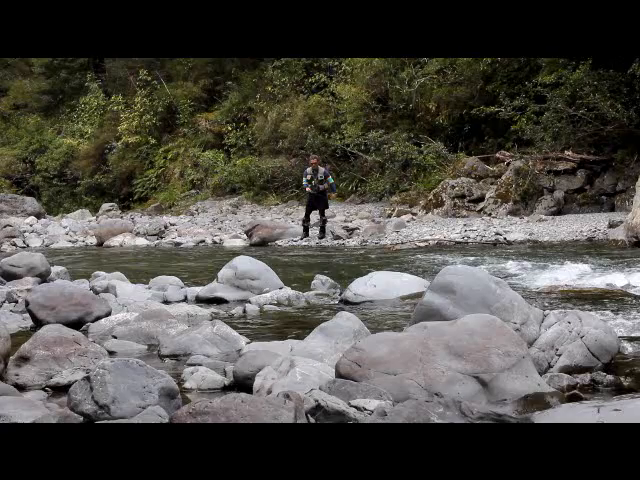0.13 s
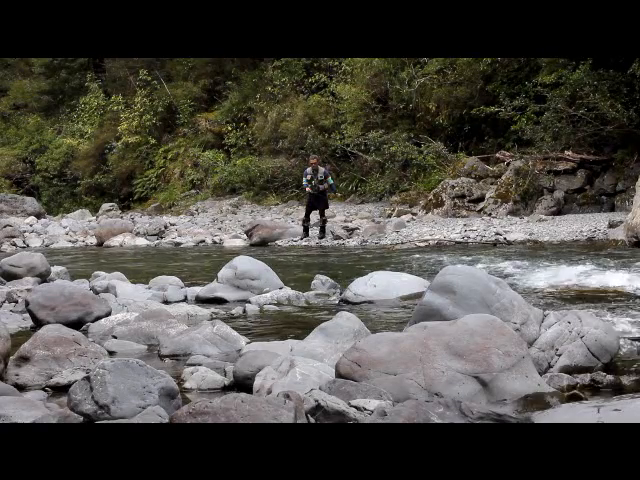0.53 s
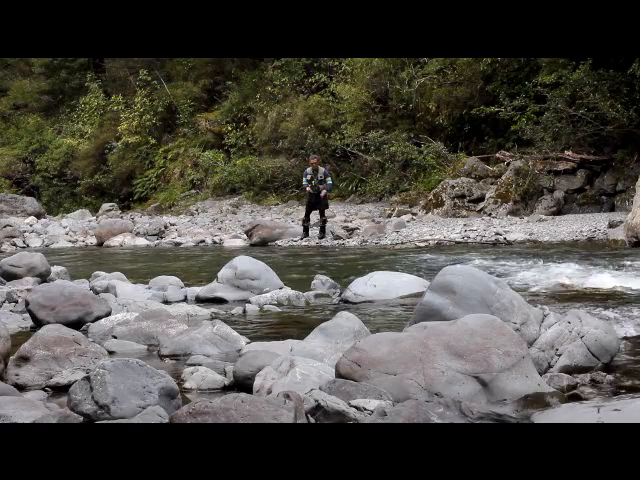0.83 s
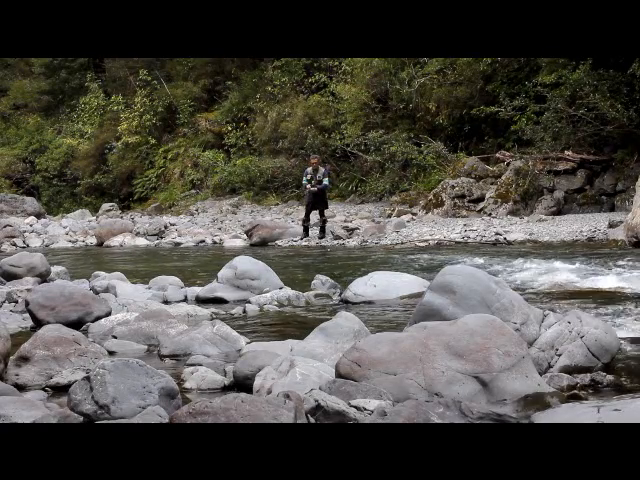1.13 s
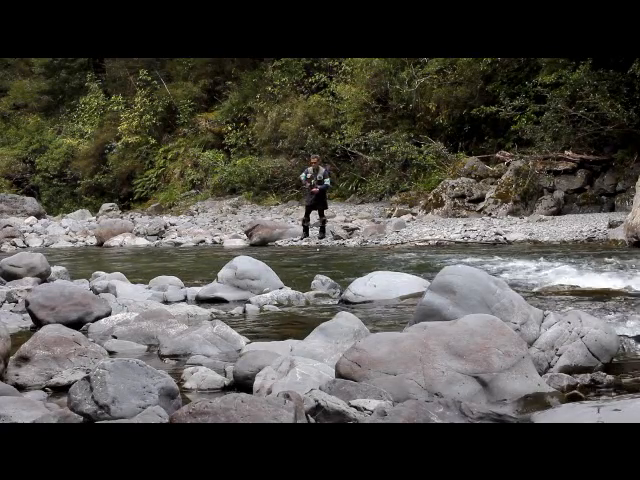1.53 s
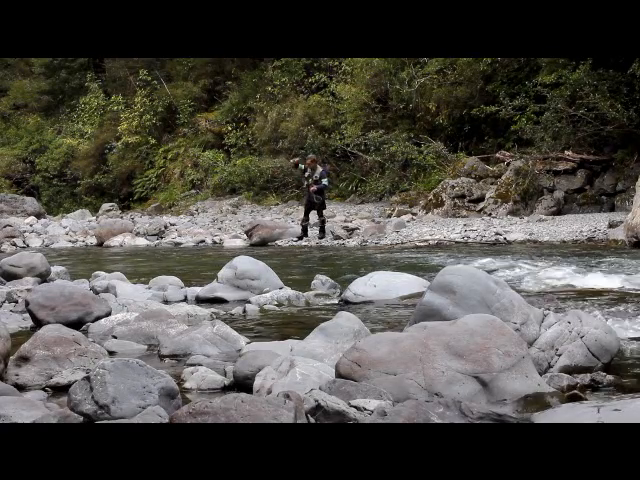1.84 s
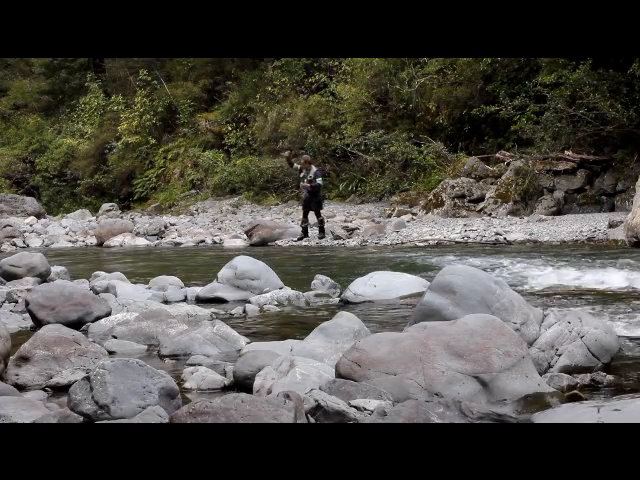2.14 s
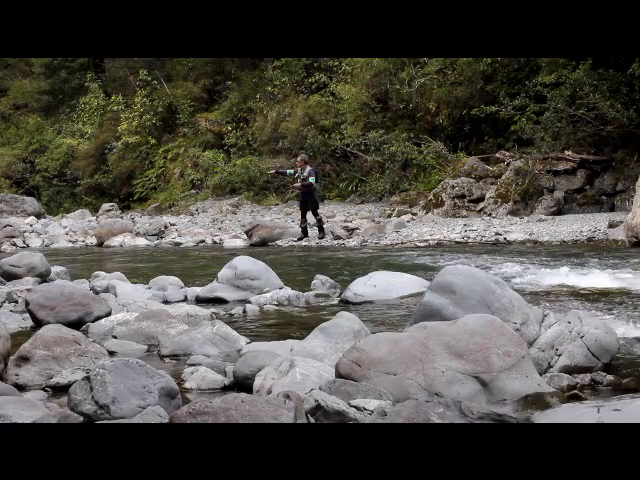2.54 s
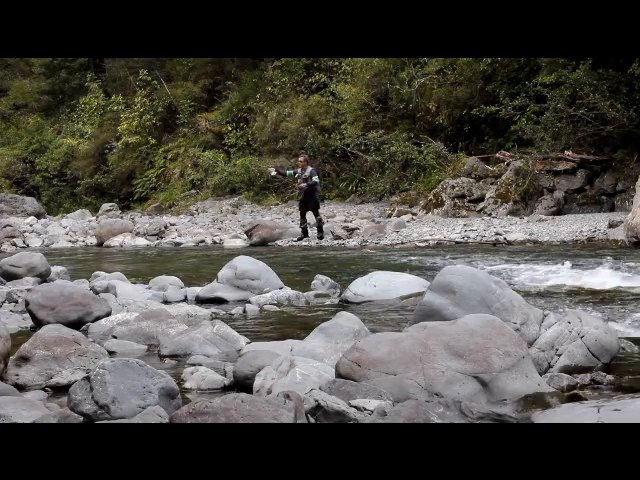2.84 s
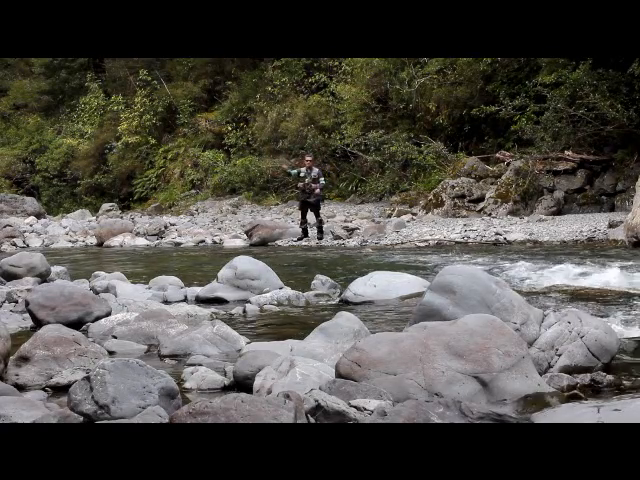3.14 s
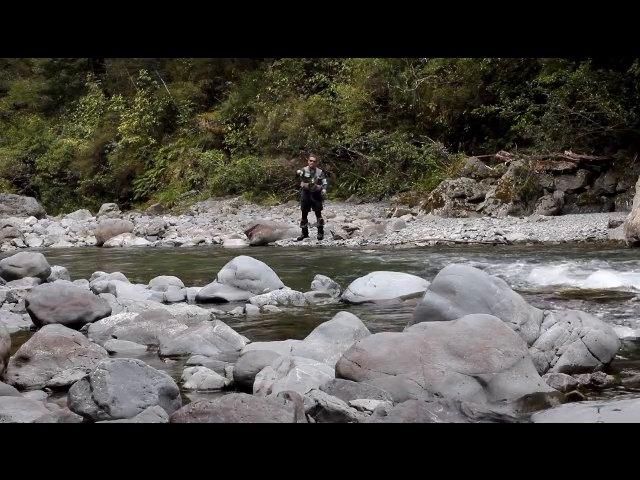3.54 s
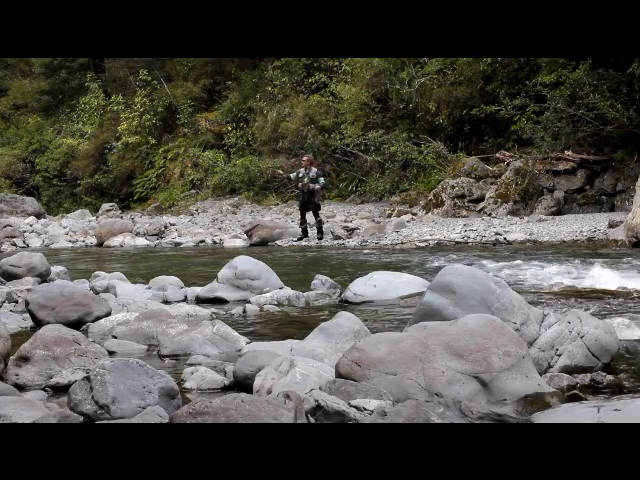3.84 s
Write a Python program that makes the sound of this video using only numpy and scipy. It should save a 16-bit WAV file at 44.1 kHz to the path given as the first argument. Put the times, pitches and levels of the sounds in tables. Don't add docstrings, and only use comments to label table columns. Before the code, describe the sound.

A shallow river tumbles over boulders, a dense mid-low rush with softer airy spray, fading up evenly from silence to its loudest at 4 s. Countless bubbles gurgle throughout. A low gulp comes at 0.75 s, a cluster of gulps and a plop at 1.7-2.1 s, a tiny tick at 2.6 s, and high plops at 3.4 and 3.9 s. A far bird whistles very faintly around 1.1 s and from 2.4 s onward.

```python
import sys
import numpy as np
from scipy import signal
from scipy.fft import rfft, irfft
from scipy.io import wavfile
from scipy.ndimage import uniform_filter1d

SR = 44100
rng = np.random.default_rng(int(sys.argv[2]) if len(sys.argv) > 2 else 0)


def file_out(sig):
    cols = np.atleast_2d(sig).T
    lim = np.clip(cols, -1, 1)
    pcm = np.round(lim * 32767).astype(np.int16)
    wavfile.write(sys.argv[1], SR, pcm)


def linear_from_db(decibels):
    return 10 ** (np.asarray(decibels, float) / 20)


N = 176400

# f/Hz, spectral level/dB
WATER_SPECTRUM = [(20, -43), (58, -36), (100, -16), (240, -6), (414, -2.5), (660, -4), (720, -9),
                  (1700, -10.5),
                  (2200, -14.5), (2800, -17), (3500, -20.5), (4200, -21), (5200, -24.5), (7000, -28),
                  (11000, -30.5), (14900, -34)]
# f/Hz, bandwidth/Hz, amplitude lift/1
HOLLOWS = [(275, 23, 0.25), (412, 48, 0.58), (630, 30, 0.51), (827, 62, 0.69), (1060, 210, 0.32)]
# t/s, level/dB
FLOW_SURGES = [(0, 1), (.3, -0.5), (.55, -1.5), (.75, -0.5), (1, 0), (1.25, -0.5), (1.48, -0.5),
               (1.68, -0.5), (1.9, -0.5), (2.15, -0.5), (2.4, -0.5), (2.65, -1), (2.9, -1), (3.15, -.5),
               (3.4, -0.5), (3.6, 0), (3.8, -0.5), (4, -0.5)]
# f/Hz, share/1
SURGE_SHARE = [(100, 0.46), (400, 3.3), (2000, 0.2), (10000, 0.22)]
# rate/(1/s), lowest f/Hz, highest f/Hz, decay/cycles, level/dB
SWARMS = [
    (34.05, 270, 470, 26.2, -38),
    (120, 4070, 13200, 9.0, -54),
]
# t/s, f/Hz, level/dB, decay/cycles
GULPS = [
    (.128, 50, -23, 1.1),
    (.67, 292, -28, 4.8),
    (.75, 300, -15, 7.5),
    (1.68, 330, -16, 8.4),
    (1.733, 830, -15, 9.0),
    (1.816, 300, -13, 7),
    (2.112, 270, -13.5, 7.9),
    (3.388, 950, -11.5, 4.8),
    (3.907, 800, -13.5, 8.6),
]
# t/s, lowest f/Hz, highest f/Hz, level/dB
SPLASHES = [(.49, 706, 1400, -29), (.66, 250, 516, -27), (.70, 248, 520, -22), (.975, 603, 1500, -27),
            (1.31, 1600, 2180, -26), (1.58, 300, 570, -24.5), (1.66, 302, 610, -23.5),
            (2.18, 450, 750, -22), (3.378, 650, 2180, -24)]
# t/s, f/Hz, level/dB, decay/cycles
DROPLETS = [
    (.721, 5300, -33, 45),
    (2.571, 4900, -29, 45),
    (3.409, 5000, -32, 45),
]
# t/s, duration/s, f/Hz, level/dB
BIRD_NOTES = [(1.02, .04, 4330, -47), (1.08, .035, 4330, -45), (1.15, .035, 4340, -46),
              (1.21, .04, 4330, -47), (2.365, .06, 4100, -46), (2.485, .105, 4080, -43),
              (2.64, .04, 4130, -46), (2.74, .03, 4100, -45), (2.94, .035, 3680, -45),
              (3.035, .045, 3850, -43), (3.15, .065, 3810, -43), (3.325, .045, 3810, -42),
              (3.46, .05, 3810, -43), (3.63, .03, 3840, -46), (3.685, .04, 3850, -43),
              (3.89, .04, 3810, -44)]
# t/s, lowest f/Hz, highest f/Hz
DIFFUSE_BANDS = [(.325, 4650, 6950), (.325, 8900, 10400), (.742, 7600, 9700), (.742, 13700, 15100),
                 (.998, 11800, 13200), (1.115, 12300, 13900), (1.162, 13700, 15100), (1.301, 14400, 15100),
                 (1.393, 10300, 12400), (1.789, 5100, 7650), (1.789, 8900, 10450), (2.298, 8300, 9800),
                 (2.509, 6850, 9700), (2.509, 11700, 13150), (3.019, 7500, 11050), (3.252, 9600, 13100),
                 (3.623, 7500, 9700)]
# t/s from which it holds, highest f/Hz
TOP_STEPS = [(0, 13200), (.21, 14700), (.28, 15100), (3.67, 14300), (3.79, 14800), (3.84, 14300),
             (3.9, 14800), (3.96, 14300)]

BUBBLE_RISE = 0.14
BUBBLE_SPREAD_DB = 1


def at_hz(points, hz):
    table_hz, values = np.array(points).T
    return np.interp(np.log(hz), np.log(table_hz), values)


def rms_one(x):
    return x / np.sqrt(np.mean(x ** 2) + 1e-20)


def drift(rate):
    pole = np.exp(-80 * np.pi * rate / SR)
    noise = rng.standard_normal(N // 40 + 2002)
    slow = signal.lfilter([1], [1, -2 * pole, pole * pole], noise)[2000:]
    return np.interp(np.arange(N) / 40, np.arange(len(slow)), rms_one(slow))


def water_gain(hz):
    lift = 1
    for centre, width, height in HOLLOWS:
        lift = lift + height / (1 + (2 * (hz - centre) / width) ** 2)
    return linear_from_db(at_hz(WATER_SPECTRUM, hz)) * lift


def band(x, low, high):
    hz = np.arange(N // 2 + 1) * SR / N
    return irfft(rfft(x) * ((hz >= low) & (hz < high)), N)


def add_bubble(out, s, hz, height, cycles):
    turns = np.arange(int(cycles * SR / hz)) * hz / SR
    onset = np.minimum(turns / min(1, cycles / 4), 1)
    decay = np.exp(-4 * turns / cycles)
    phase = 2 * np.pi * turns * (1 + BUBBLE_RISE * turns / cycles)
    wave = height * onset * decay * np.sin(phase)
    start = int(s * SR)
    out[start:start + len(wave)] += wave[:len(out) - start]


def rush():
    hz = np.arange(N // 2 + 1) * SR / N + 1
    spectrum = rfft(rng.standard_normal(N)) * water_gain(hz)
    flow_db = np.interp(np.arange(N) / SR, *np.transpose(FLOW_SURGES))
    chop_db = 0.35 * drift(18)
    out = np.zeros(N)
    for octave in np.arange(4, 14.5, .5):
        share = np.clip(1 - 2 * abs(np.log2(hz) - octave), 0, 1)
        surge_db = at_hz(SURGE_SHARE, 2 ** octave) * flow_db
        patch_db = 0.5 * drift(19.0)
        out += irfft(spectrum * share, N) * linear_from_db(surge_db + chop_db + patch_db)
    return linear_from_db(-27) * rms_one(out)


def bubbles():
    rate_per_s, cycles = 900, 10.5
    out = np.zeros(N)
    for when, size, loud, sign in rng.random((int(rate_per_s * N / SR), 4)):
        hz = 180 * 50 ** size
        scatter = linear_from_db(-BUBBLE_SPREAD_DB * np.log(loud + 0.039))
        height = water_gain(hz) * hz ** 0.6 * scatter
        add_bubble(out, when * (N - 1) / SR, hz, np.sign(sign - .5) * height, cycles)
    return linear_from_db(-34.5) * rms_one(out)


def swarms():
    out = np.zeros(N)
    for rate, low, high, cycles, level_db in SWARMS:
        part = np.zeros(N)
        for when, size, loud in rng.random((int(rate * N / SR), 3)):
            hz = low * (high / low) ** size
            scatter = linear_from_db(-BUBBLE_SPREAD_DB * np.log(loud + 0.065))
            add_bubble(part, when * (N - 1) / SR, hz, scatter, cycles)
        out += linear_from_db(level_db) * rms_one(part)
    return out


def gulps_and_droplets():
    out = np.zeros(N)
    for s, hz, level_db, cycles in GULPS + DROPLETS:
        add_bubble(out, s, hz, linear_from_db(level_db), cycles)
    return out


def splashes():
    splash_s = .025
    out = np.zeros(N)
    for s, low, high, level_db in SPLASHES:
        for when, size in rng.random((12, 2)):
            add_bubble(out, s + splash_s * when, low * (high / low) ** size, linear_from_db(level_db), 9.0)
    return out


def bird():
    echo_s, echo_db = 0.094, -18
    t = np.arange(N) / SR
    wobbling_t = np.cumsum(1 + .004 * drift(40)) / SR
    out = np.zeros(N)
    for s, length, hz, level_db in BIRD_NOTES:
        progress = np.clip((t - s) / length, 0, 1)
        note = np.sin(np.pi * progress) ** 0.47
        echo = linear_from_db(echo_db) * np.exp(-np.maximum(t - s - length, 0) / echo_s) * progress
        out += linear_from_db(level_db) * (note + echo) * np.sin(2 * np.pi * hz * wobbling_t)
    return out


def scene():
    mono = rush() + bubbles() + swarms() + gulps_and_droplets() + splashes() + bird()
    return np.tile(mono, (2, 1))


def roll_off(x):
    return signal.sosfilt(signal.butter(12, 15060, fs=SR, output="sos"), x)


def record(dry):
    fade_start_s, fade_full_s, fade_knee_s = 0.054, 4.2, 0.043
    diffuse_s, side_share = 0.053, 0.73
    t = np.arange(N) / SR
    since = np.maximum(t - fade_start_s, 0)
    fade = since / fade_full_s * (1 - np.exp(-since / fade_knee_s)) ** 2
    mid, side = dry[0].copy(), np.zeros(N)
    for s, low, high in DIFFUSE_BANDS:
        window = np.cos(np.pi * np.clip((t - s) / diffuse_s, -.5, .5)) ** 2
        part = band(dry[0], low, high)
        mid -= (1 - np.sqrt(1 - side_share ** 2)) * window * part
        side += side_share * window * np.roll(part, SR // 2)
    for (s, top_hz), (until, _) in zip(TOP_STEPS, TOP_STEPS[1:] + [(5, 0)]):
        active = uniform_filter1d(1. * (t >= s) * (t < until), size=300)
        mid -= band(dry[0], top_hz, SR / 2) * active
    return roll_off(fade * np.array([mid + side, mid - side]))


dry = scene()
out = record(dry)
file_out(out)
```